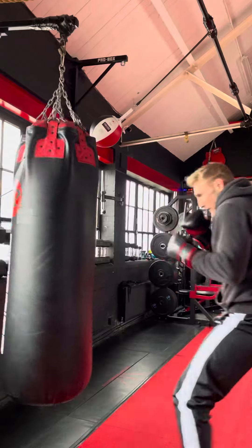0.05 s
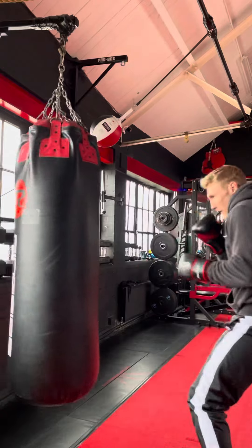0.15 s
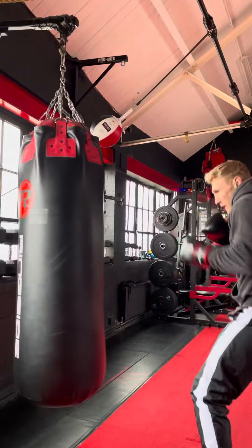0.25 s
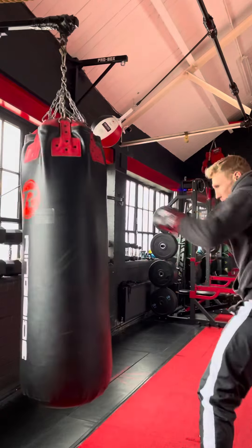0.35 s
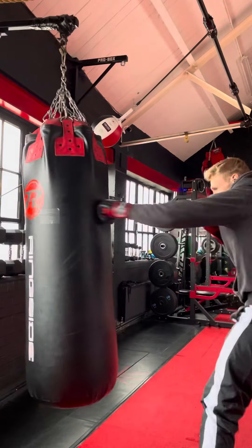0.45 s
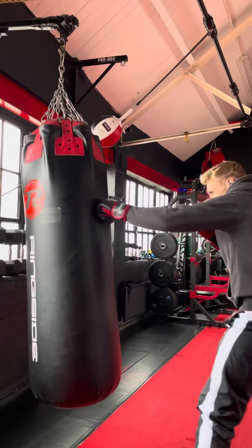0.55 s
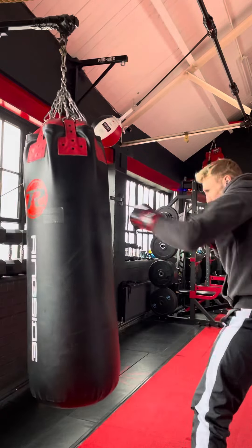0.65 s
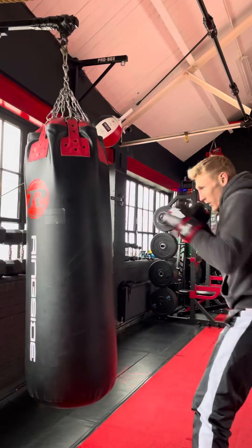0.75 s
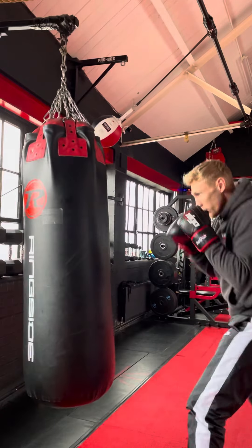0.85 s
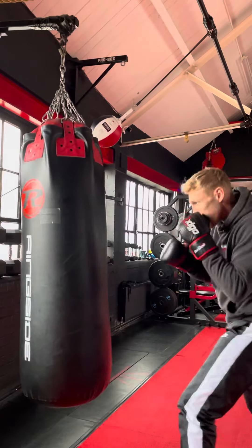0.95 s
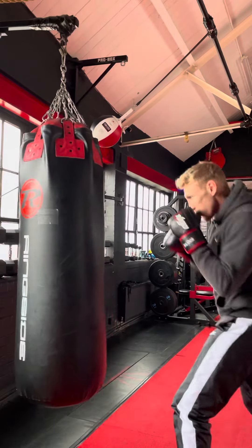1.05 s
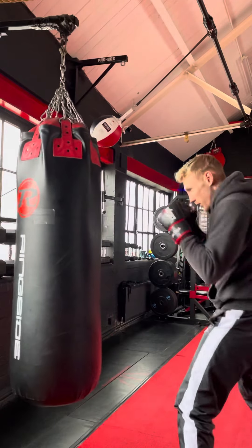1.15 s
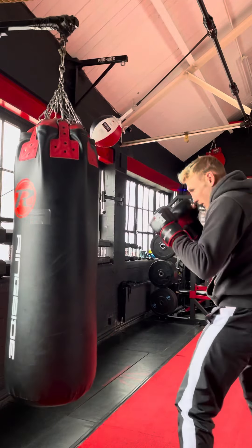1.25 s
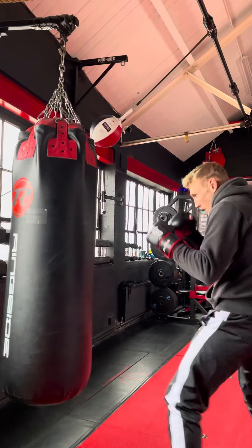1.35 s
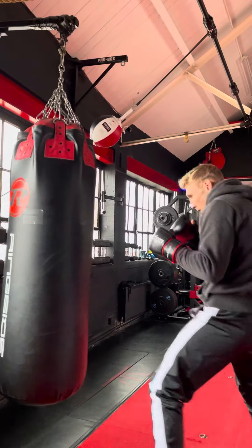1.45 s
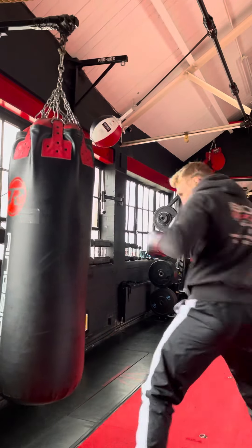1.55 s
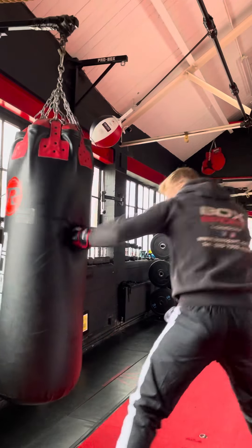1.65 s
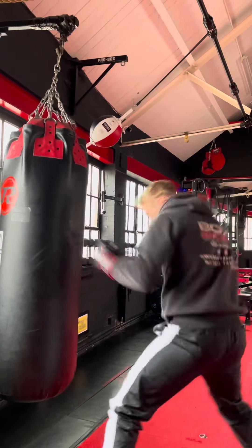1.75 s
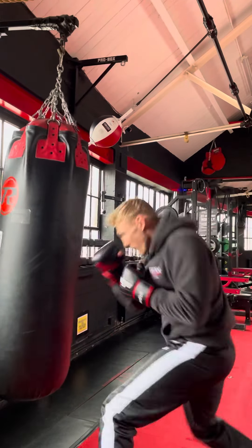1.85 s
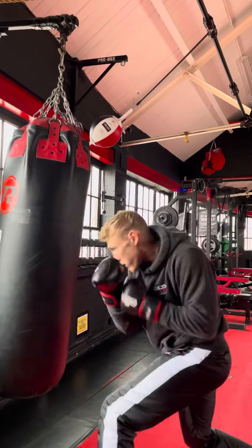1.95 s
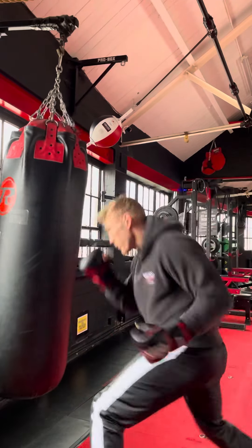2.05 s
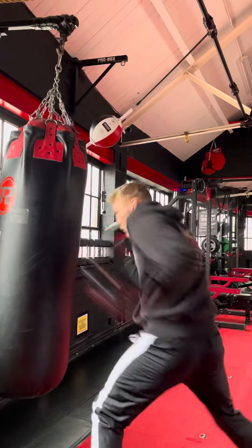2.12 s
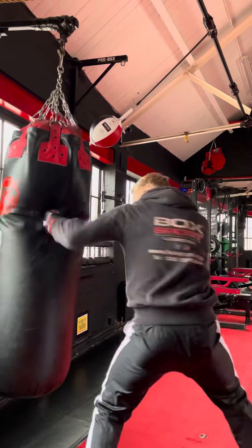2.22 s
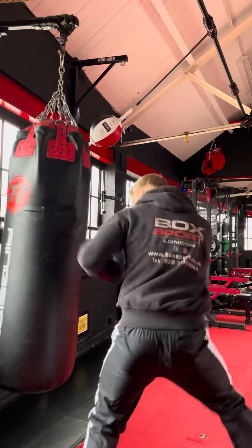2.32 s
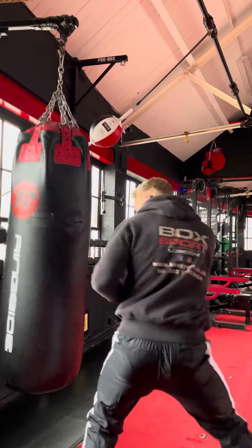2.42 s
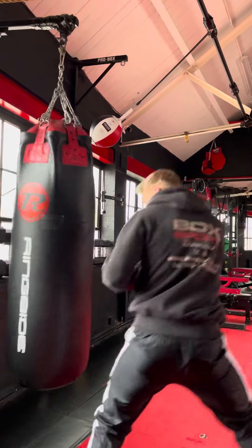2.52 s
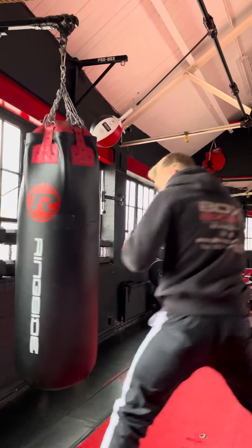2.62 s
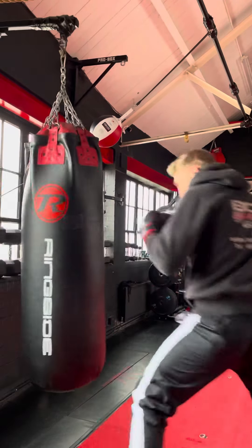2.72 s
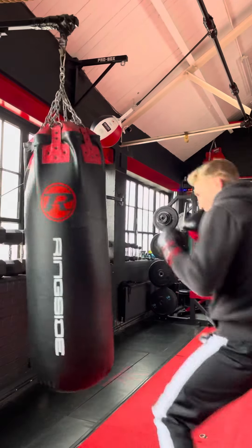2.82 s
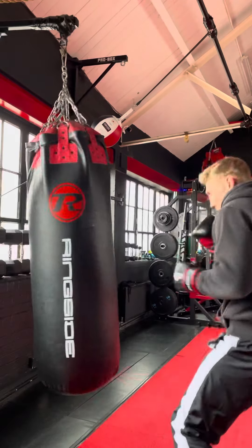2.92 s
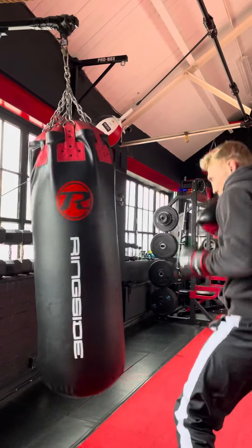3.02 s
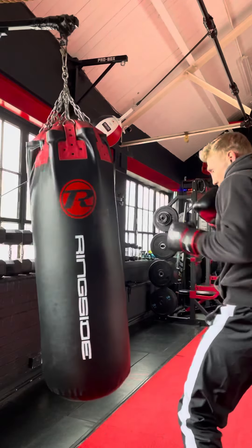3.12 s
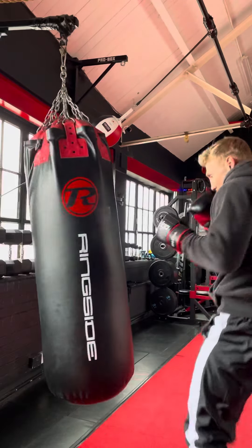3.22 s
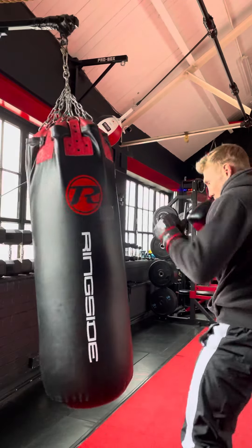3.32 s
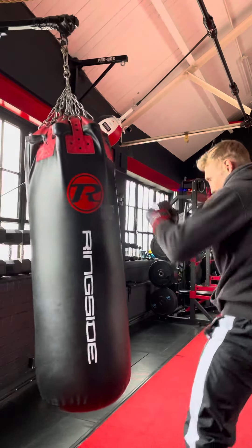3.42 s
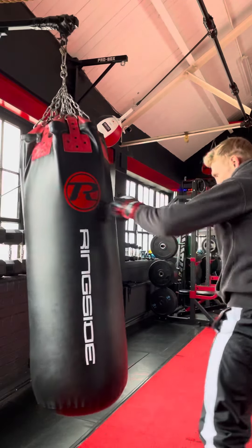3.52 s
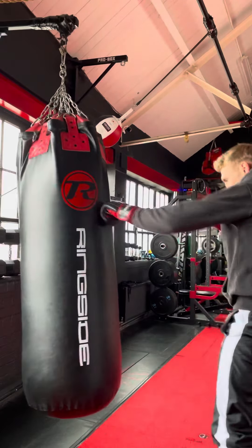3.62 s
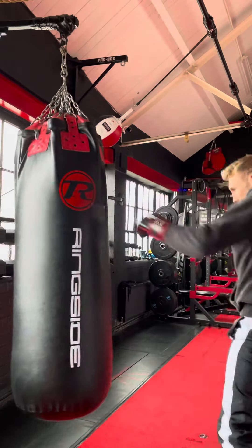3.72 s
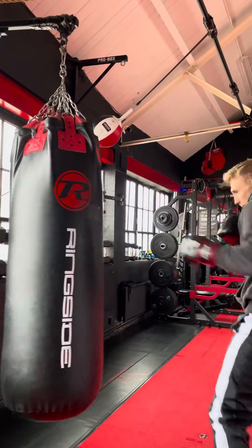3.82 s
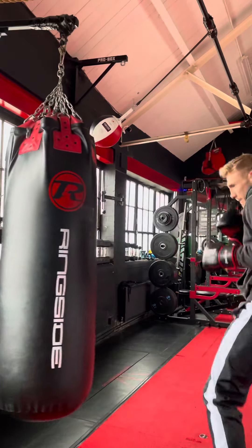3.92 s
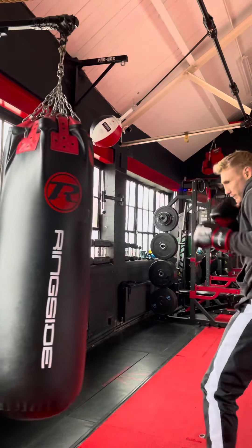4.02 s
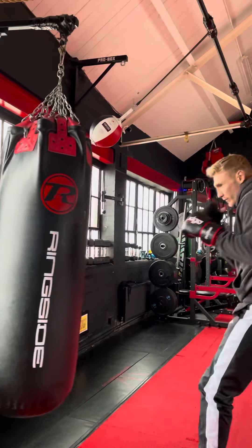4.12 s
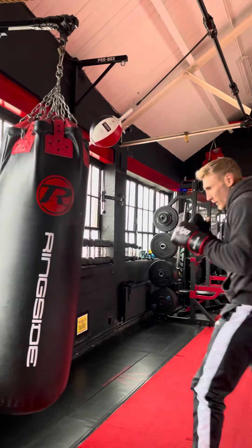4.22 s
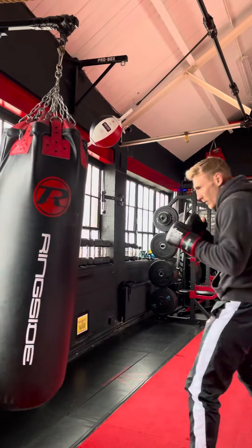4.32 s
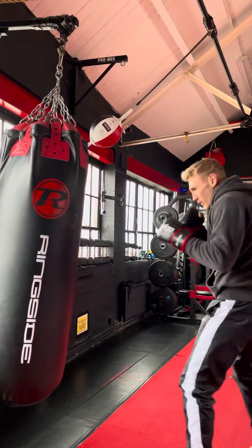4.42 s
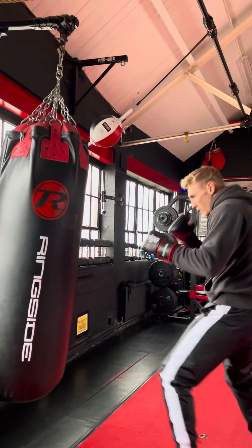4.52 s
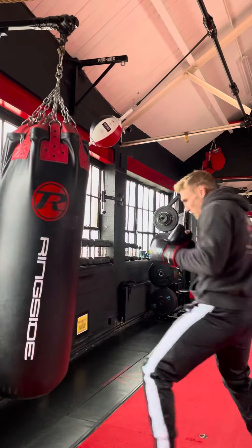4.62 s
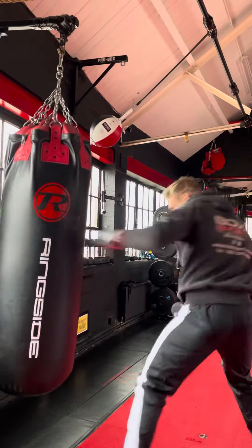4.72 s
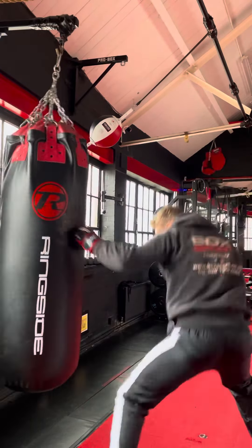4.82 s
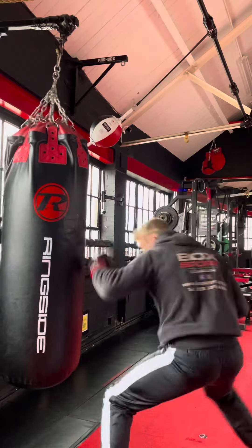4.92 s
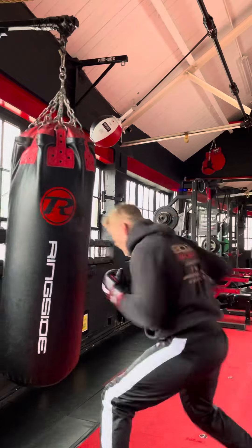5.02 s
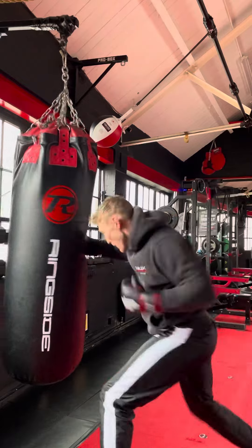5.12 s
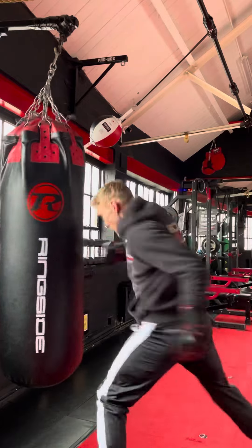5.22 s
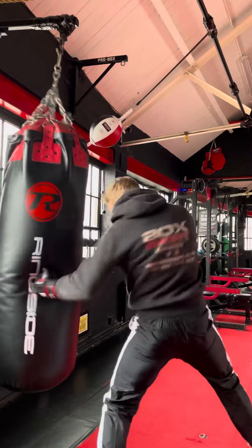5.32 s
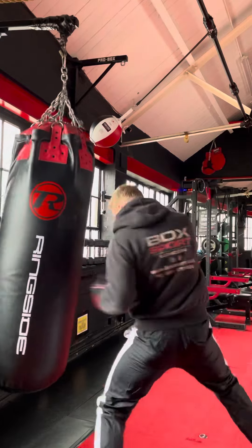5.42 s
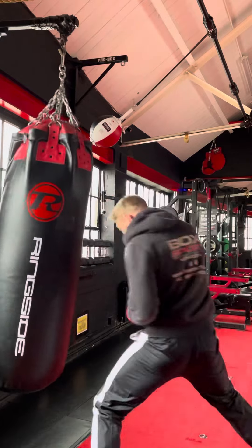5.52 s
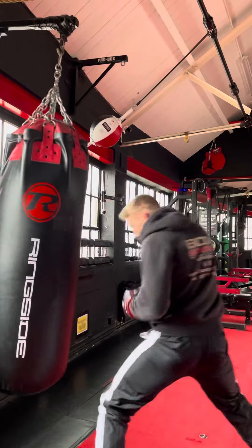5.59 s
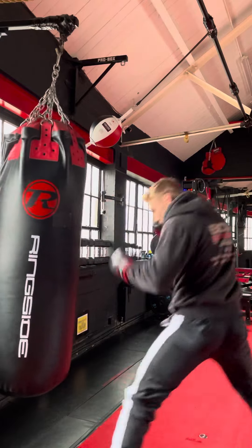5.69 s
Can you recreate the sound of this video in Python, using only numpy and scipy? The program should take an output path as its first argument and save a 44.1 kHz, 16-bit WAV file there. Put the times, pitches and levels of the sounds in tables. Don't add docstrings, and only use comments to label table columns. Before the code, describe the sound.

A boxer's gloved fists crack and thud into a hanging leather heavy bag in a reverberant gym, chain jingling and squeaking after each blow.

```python
import sys
import numpy as np
from scipy import signal
from scipy.fft import rfft, irfft
from scipy.io import wavfile
from scipy.ndimage import uniform_filter1d

SR = 44100
rng = np.random.default_rng(int(sys.argv[2]) if len(sys.argv) > 2 else 0)


def bounce(signal):
    frames = np.transpose(np.atleast_2d(signal))
    limited = np.clip(frames, -1, 1)
    pcm = np.round(limited * 32767).astype(np.int16)
    wavfile.write(sys.argv[1], SR, pcm)


def attenuation_scalar(level_db):
    decades = np.asarray(level_db, float) / 20
    return 10 ** decades


N = 253619
GAIN_HOP = 64
PUNCH_LEAD_S = 0.012

# (frequency [Hz], level [dB per Hz])
CRACK_COLOUR = [(200, 11), (800, -3), (2000, -1.5), (3200, 0), (5000, -4), (7000, -4.5), (11000, -15.5),
                (16000, -20)]


def leather_crack(t, sweep, brush_db, slap_ms, slap_db):
    after = np.maximum(t, 0)
    grit = evened(colour(rng.standard_normal(len(t)), lambda hz: attenuation_scalar(read(CRACK_COLOUR, hz))))
    snap = (t > 0) * grit * attenuation_scalar(-60 * after / 0.0061)
    late = np.maximum(t - slap_ms / 1000, 0)
    second = (late > 0) * grit * attenuation_scalar(slap_db - 60 * late / 0.01)
    rubbed = evened(colour(grit, lambda hz: 1 / (1 + ((hz - 3300) / 2200) ** 4)))
    brush = rubbed * attenuation_scalar(brush_db - 60 * after / 0.015) * np.clip((t + 0.011) / 0.008, 0, 1)
    return 1.376 * sweep * attenuation_scalar(-60 * after / 0.016) + 1.5 * snap + second + brush


def filling_thud(after, sweep, crack_db, thud_db, thud_hz):
    wall_s, wall_db = 0.01096, -13.5
    thud = attenuation_scalar(9.0) * sweep * (1 - np.exp(-after / 0.004)) * attenuation_scalar(-60 * after / 0.056)
    knock = (after > 0) * np.sin(2 * np.pi * 3.39 * thud_hz * after) * attenuation_scalar(-60 * after / 0.033)
    packed = attenuation_scalar(thud_db) * thud + attenuation_scalar(crack_db - 12.5) * knock
    delayed = np.roll(packed, round(wall_s * SR))
    return packed + attenuation_scalar(wall_db) * colour(delayed, lambda hz: 1 / (1 + (hz / 260) ** 4))


# (frequency [Hz], level [dB], T60 [s])
BAG_MODES = [(97.2, -1, 0.53), (120, -27, 0.31), (147.6, 6.5, 0.28), (204, 14.5, 0.11)]


def bag_boom(after, boom_db, swing_db):
    boom = 0
    for hz, db, t60 in BAG_MODES:
        mode_hz = hz * rng.uniform(0.928, 1.07)
        boom = boom + attenuation_scalar(db - 60 * after / t60) * np.sin(2 * np.pi * (mode_hz * after + rng.random()))
    swing = np.sin(2 * np.pi * (42 * after + 0.69 * (1 - np.exp(-after / 0.017))))
    swing = swing * attenuation_scalar(swing_db - 60 * after / 0.62)
    fold = 1.06 * np.sin(2 * np.pi * 185 * after) * attenuation_scalar(swing_db + 7.0 - 60 * after / 0.13)
    swell_in = 1 - np.exp(-after / 0.0041)
    return swell_in * (attenuation_scalar(boom_db) * boom + swing + fold)


# (time [s], crack peak [dB], brush [dB], second slap delay [ms], second slap [dB])
PUNCHES = [
    (0.4613, -20.5, -26, 4.4, -3.5),
    (1.6426, -10, -31, 3.9, -0.5),
    (2.208, -6, -14, 5.4, 6.5),
    (4.7542, -5, -30, 3.24, -4),
    (5.1195, -14, -11.5, 3.3, 6.5),
    (5.3274, -7.5, -13.5, 3.82, 6),
]
# (thud [dB], thud pitch [Hz], boom [dB], swing of the whole bag [dB], hall [dB])
FILLING = [
    (-25, 205, -36.5, -39, -6.5),
    (-17, 294, -28.5, -50, -2),
    (-14.5, 294, -33.5, -23, -7.5),
    (-22, 267, -27, -50, -4),
    (-13, 316, -28, -21.5, -1),
    (-17.5, 282, -28, -19, -5.5),
]


def punch(crack_db, brush_db, slap_ms, slap_db, thud_db, thud_hz, boom_db, swing_db):
    t = np.arange(-PUNCH_LEAD_S, 0.45, 1 / SR)
    after = np.maximum(t, 0)
    packing_hz = thud_hz * (0.552 + 0.83 * np.exp(-after / 0.0076))
    sweep_hz = packing_hz + 5000 * np.exp(-after / 0.000415)
    sweep = np.sin(2 * np.pi * np.cumsum(sweep_hz * (t > 0)) / SR)
    crack = attenuation_scalar(crack_db) * leather_crack(t, sweep, brush_db, slap_ms, slap_db)
    thud = filling_thud(after, sweep, crack_db, thud_db, thud_hz)
    return crack + thud + bag_boom(after, boom_db, swing_db)


# (start [s], peak [dB], pitch [Hz])
THUMPS = [(1.649, -23, 110), (1.689, -22, 107), (1.756, -22, 104.5), (1.864, -23, 104), (1.95, -26.5, 93.3),
          (2.206, -18, 68.4), (4.756, -16, 120), (4.795, -21, 112), (4.867, -23, 110), (4.974, -20.5, 109),
          (5.054, -25.5, 108), (5.119, -19.5, 70), (5.325, -20.5, 87), (5.422, -22, 98)]


def thump(db, hz):
    length_s = 0.044
    t = np.arange(int(length_s * SR)) / SR
    return attenuation_scalar(db) * np.sin(np.pi * t / length_s) ** 2 * np.sin(2 * np.pi * hz * t * (1.15 - 4 * t))


# (time [s], peak [dB], middle pitch [Hz], slip length [ms], ring [dB])
SQUEAKS = [(0.075, -32, 11500, 5.8, -28), (0.8636, -37, 11580, 24, -6), (0.953, -25.5, 11530, 21.6, -15),
           (1.0476, -35, 11520, 20.9, -5), (1.131, -28.5, 11530, 20.3, -29.5),
           (1.197, -36.5, 11520, 20.4, -6), (1.3163, -29, 11520, 20, -12), (1.689, -21.5, 11470, 17, -27),
           (1.924, -28.5, 11570, 19, -9.5), (2.015, -32.5, 11470, 38, -6), (2.112, -23.5, 11450, 25, -10),
           (2.9358, -20, 11480, 16, -23), (3.0242, -31, 11470, 24.6, -13), (3.116, -30, 11500, 18, -17.5),
           (4.8058, -21, 11430, 19, -15), (5.0643, -19.5, 11420, 12.4, -30), (5.1677, -31.5, 11360, 19, -4),
           (5.2617, -33.5, 11450, 24, 2), (5.636, -30, 11460, 20, -8)]
# (time [s], peak [dB], middle pitch [Hz], rise [Hz], ring [dB])
LINKS = [(.074, -40, 10200, 600, -18), (2.402, -35, 10750, 80, -10), (2.5067, -28, 9150, 80, -8),
         (2.527, -31, 9330, 250, -8), (2.7337, -26, 11980, 80, -15), (2.748, -27, 9000, 450, -22),
         (2.762, -30, 9440, 30, -3), (2.8295, -25, 11200, 80, -15), (2.924, -29, 10800, 150, -10),
         (3.388, -41, 9800, 600, -20), (5.378, -29, 10830, 80, -9)]
HOOK_RISE_HZ, LINK_SLIP_MS = 374, 20.7


def squeak(db, hz, rise_hz, slip_ms, ring_db):
    t = np.arange(SR // 2) / SR
    slip_s = slip_ms / 1000
    progress = np.minimum(t / slip_s, 1)
    waver = 45 * evened(uniform_filter1d(rng.standard_normal(len(t)), size=200))
    pitch = hz - 0.5 * rise_hz + rise_hz * progress + waver
    push = np.sin(np.pi * progress ** 0.7)
    ring = (1 - np.exp(-t / slip_s)) * attenuation_scalar(ring_db - 60 * t / 0.62)
    return attenuation_scalar(db - 1) * (push + ring) * np.sin(2 * np.pi * np.cumsum(pitch) / SR)


# (frequency [Hz], width [Hz], level [dB])
JINGLE_MODES = [(13300, 90, 0), (13390, 70, -2), (13520, 80, -2), (13710, 80, -4), (14250, 70, -9)]
# (frequency [Hz], level [dB per Hz])
FIZZ_COLOUR = [(7000, -8), (8500, 10.5), (9500, 4.5), (11000, 7.5), (12100, -2), (12500, -26), (14500, -27),
               (15800, -38)]
# (time [s], jingle [dB], fizz [dB], held [s], fade by 20 dB [s])
SHAKES = [(0.0, -56.5, -55.5, 0.012, 0.3), (.215, -58.5, -60, 0.03, 0.4), (.525, -50.5, -56, 0.2, 0.34),
          (.82, -47, -62, 0.044, -1.1), (.93, -52, -51.5, 0.035, 0.17), (1.04, -65, -62, 0.053, -0.8),
          (1.16, -62, -73, 0.097, .02), (1.5, -90.5, -82, .1, -2), (1.76, -38, -41.5, 0.12, -1.3),
          (1.89, -32.5, -40, .02, 0.3), (1.99, -32.5, -40, 0.017, 0.43), (2.26, -36, -37, 0.045, 0.66),
          (2.55, -52, -35.5, 0.071, 0), (2.93, -55, -49, 0.13, 0.12), (3.2, -69, -66, .12, 0.5),
          (3.45, -72, -56, 0.15, 0.2), (3.83, -69, -61.5, 0.083, 0.1), (3.99, -75, -64.5, 0.051, 0.4),
          (4.21, -75, -77, 0.13, -0.5), (4.56, -72.5, -66, 0.047, 4), (4.83, -33.5, -38.5, 0.048, 0.5),
          (5.08, -39, -35.5, 0.024, 1.2), (5.24, -35, -40, 0.19, .5), (5.66, -41.5, -43, 0.053, 3)]


def chain():
    rise_s = 0.053
    struck = rng.random(N) < 2200 / SR
    force = attenuation_scalar(2.3 * np.minimum(rng.exponential(1, N), 4)) * rng.standard_normal(N)

    def modes(f):
        return sum(attenuation_scalar(db) / (1 + 1j * (f - hz) / width) ** 3 for hz, width, db in JINGLE_MODES)

    ring = evened(colour(struck * force, modes))
    jingle_gain = summed(swell(s, db, held, fade, rise_s) for s, db, _, held, fade in SHAKES)
    fizz_gain = summed(swell(s, db, held, 0.86 * fade, 2.3 * rise_s) for s, _, db, held, fade in SHAKES)
    jingle = attenuation_scalar(8.5) * ring * jingle_gain
    fizz = attenuation_scalar(-5) * noise(FIZZ_COLOUR, patchy_db=5.5) * fizz_gain
    return jingle + attenuation_scalar(-30) * hall(jingle) + fizz


# (start [s], level [dB], reach downwards [octaves])
FLECKS = [(.04, -78, .15), (.15, -71, 0.092), (.295, -76, .15), (.455, -68, 0.077), (.55, -75, .15),
          (.665, -68, 0.11), (.69, -58, .03), (.8, -70, .14), (.915, -58, .04), (1.1, -80, .15),
          (1.165, -68, .1), (1.53, -71, 0.089), (1.58, -72.5, .03), (1.71, -66, .15), (2.21, -54, 0.083),
          (2.73, -47, 0.13), (2.89, -58, .03), (3.11, -75, .12), (3.405, -75, .04), (3.435, -69, .04),
          (3.525, -67, .04), (3.575, -68, .03), (3.725, -71, .03), (3.8, -76, .1), (3.825, -72, .03),
          (3.96, -76, .08), (4.14, -83, 0.071), (4.18, -73, 0.023), (4.47, -75, .04), (4.52, -82, .04),
          (4.66, -75, .04), (4.69, -73, .04), (5.7, -51, 0.11), (.93, -63, .1), (1.875, -44, .03),
          (1.975, -41, .1), (2.087, -48.5, 0.027), (2.49, -52, 0.092), (2.567, -46, 0.026),
          (2.92, -52, 0.089), (3.04, -58, 0.17), (4.79, -45, 0.027), (4.91, -34, 0.17), (5.05, -40, 0.027),
          (5.11, -43, 0.079), (5.275, -44, 0.092), (5.582, -51, .03)]


def fleck(db, octaves):
    return attenuation_scalar(2) * scrape(db, 15950 / 2 ** octaves, octaves, 0.045)


# (time [s], level [dB], centre [Hz], width [octaves], length [s])
SCRAPES = [(1.53, -57, 600, .6, .06), (2.64, -47, 5400, .07, .22), (2.77, -42, 200, .4, .1),
           (3.03, -43, 3000, .8, .06), (3.52, -45, 340, .15, .15), (4.24, -51, 300, .5, .07),
           (4.32, -51, 430, .25, .4), (.82, -54, 3400, .08, .07), (1.97, -47, 3200, .12, .07),
           (4.81, -44, 2090, .04, .13), (5.43, -39, 200, .2, .32), (3.385, -50, 2000, .15, .025)]


def scrape(db, hz, octaves, length):
    u = np.linspace(0, 1, int(length * SR))
    band = colour(rng.standard_normal(len(u)), lambda f: np.exp(-(np.log2((f + 1) / hz) / octaves) ** 2))
    return attenuation_scalar(db) * evened(band) * np.sin(np.pi * u ** 0.65)


# (time [s], peak [dB], centre [Hz], hall [dB])
TICKS = [(0.075, -34.5, 860, 6), (0.158, -34.5, 2500, -13), (0.209, -32, 3120, -8), (0.310, -35, 2000, -15),
         (0.382, -41.5, 2050, -20), (0.419, -42, 1270, -15), (0.642, -32, 810, -23), (0.739, -37, 1200, 4),
         (0.807, -28.5, 1910, -8), (0.929, -33, 3400, 2), (0.964, -33.5, 3800, -6), (1.06, -38.5, 1170, 5),
         (1.539, -43, 795, 4), (1.596, -45, 900, 4), (2.086, -28.5, 4470, 4.5), (2.656, -24, 5240, 4.5),
         (2.927, -28.5, 1080, -4), (3.023, -22, 2410, -27), (3.033, -31, 3000, -17),
         (3.048, -29, 2780, -13), (3.252, -45, 1200, -6), (3.391, -33, 500, -15.5), (3.419, -41, 800, -15),
         (3.967, -42.5, 700, -5), (3.562, -34, 2640, 7.5), (3.847, -35.5, 4200, 3), (4.189, -42, 4300, 5.5),
         (4.254, -37.5, 910, 1), (4.344, -40, 1390, -2), (4.428, -42, 1120, 9)]


def tick(db, hz):
    t = np.arange(4000) / SR

    def broad_band(f):
        return 1 / (1 + (1.44 * np.log((f + 1) / hz)) ** 2) / (1 + (f / 13000) ** 4)

    band = evened(colour(rng.standard_normal(len(t)), broad_band))
    body = attenuation_scalar(db - 10 - 26 * t / 0.0154)
    edge = attenuation_scalar(db - 3.5 - 60 * t / 0.0043)
    return band * (body + edge)


def settling():
    late_s, rise_s, fade_s = 0.049, 0.043, 0.5
    return sum(swell(blow[0] + late_s, blow[1] + filling[-1], 0, fade_s, rise_s)
               for blow, filling in zip(PUNCHES, FILLING))


# (frequency [Hz], level [dB per Hz])
FEET_COLOUR = [(100, -28), (140, -5), (180, -2), (260, -4), (335, -4.5), (420, -5), (520, -5.5),
               (1000, -21), (1400, -70)]
# (frequency [Hz], level [dB per Hz])
RUSTLE_COLOUR = [(410, -12), (700, -2.5), (1130, -5.5), (1740, -8), (3160, -12.5), (4400, -10.5),
                 (5390, -15), (9000, -23), (12500, -54)]
# (time [s], level [dB])
MOTION = [(0, -47.5), (.15, -55), (.42, -57.5), (.66, -51.5), (1.0, -53), (1.3, -62.5), (1.55, -64.5),
          (2.0, -49), (2.7, -43), (2.9, -45.5), (3.08, -47.5), (3.27, -55.5), (3.57, -50), (3.72, -63),
          (3.85, -55), (4.1, -66), (4.4, -64), (5.75, -42.5)]
# (time [s], level [dB], fade by 20 dB [s])
SHUFFLES = [
    (.1, -51.5, 1.6),
    (2.85, -42.5, .5),
    (3.25, -47.5, 1.8),
    (3.58, -45.5, 0.4),
    (4.3, -50, 1.5),
    (4.52, -43.5, 0),
    (5.24, -46, -2.5),
]


def boxer(settle):
    motion_db = np.interp(np.arange(0, N + GAIN_HOP, GAIN_HOP) / SR, *np.transpose(MOTION))
    steps = [swell(s, db, 0, fade, 0.067) for s, db, fade in SHUFFLES]
    walking = attenuation_scalar(-6.5 + 0.84 * motion_db)
    feet = attenuation_scalar(1.5) * noise(FEET_COLOUR, patchy_db=2.5, size=1024)
    feet = feet * summed(steps + [walking, attenuation_scalar(-20) * settle])
    rustle = attenuation_scalar(2) * noise(RUSTLE_COLOUR, patchy_db=3.0)
    return feet + rustle * summed([attenuation_scalar(motion_db), attenuation_scalar(-22) * settle])


# (frequency [Hz], level [dB per Hz])
THROB_COLOUR = [(20, -55), (40, -9.5), (60, -1), (80, 0), (97, 0), (115, -6.5), (140, -5.5), (180, -20),
                (230, -48.5)]
# (peak time [s], level [dB], fade by 20 dB [s])
THROBS = [(0.099, -34, 0), (.51, -38, 0.2), (.8, -41.5, 0.2), (1.02, -43.5, 0.5), (1.499, -43, 0.7),
          (2.75, -39.5, .5), (3.27, -45.5, 0.3), (3.79, -40, 0.27), (4.0, -51, -3), (4.21, -43, 0.83),
          (4.449, -39.5, 0), (5.7, -35.5, 2)]


def bracket_and_floor(settle):
    leaning = [swell(s, db, 0, fade, min(fade, 0.3)) for s, db, fade in THROBS]
    load = summed([attenuation_scalar(-53), attenuation_scalar(-18) * settle] + leaning)
    throb = attenuation_scalar(-2.0) * noise(THROB_COLOUR, patchy_db=1.5, size=2048)
    wander = evened(uniform_filter1d(uniform_filter1d(rng.standard_normal(N), size=2500), size=2500))
    hum = attenuation_scalar(-3) * np.sin(2 * np.pi * np.cumsum(98 + 12 * wander) / SR)
    return (throb + hum) * load


# (frequency [Hz], T60 [s])
HALL_T60 = [(60, 0.39), (250, 0.58), (1000, 0.75), (4000, 0.95), (9000, 0.36), (14000, 0.38)]


def hall(x):
    taps = np.zeros((2, SR))
    at = np.arange(500, SR - 20, 20) + rng.integers(0, 20, (2, (SR - 501) // 20))
    np.put_along_axis(taps, at, rng.choice([-1., 1.], at.shape), 1)
    hz, t, z = signal.stft(taps, SR, nperseg=256)
    fading = z * attenuation_scalar(-60 * t / read(HALL_T60, hz)[:, None])
    tail = signal.istft(fading, SR, nperseg=256)[1]
    return signal.fftconvolve(x[None], tail / np.linalg.norm(tail[0]), axes=1)[:, :N]


def evened(x):
    return x / np.sqrt(np.mean(x ** 2) + 1e-20)


def read(points, hz):
    f, value = np.transpose(points)
    return np.interp(np.log(hz + 1), np.log(f + 1), value)


def add(mix, s, sound):
    part = mix[max(round(s * SR), 0):][:len(sound)]
    part += sound[:len(part)]


def colour(x, gain):
    return irfft(rfft(x) * gain(np.fft.rfftfreq(x.shape[-1], 1 / SR)), x.shape[-1])


def noise(spectrum, patchy_db, size=512):
    frames, hz = 4 * N // size + 5, np.fft.rfftfreq(size, 1 / SR)
    a, b, c, d, patches = rng.standard_normal((frames, len(hz), 5)).T
    patches = uniform_filter1d(patches, size=8, axis=0)
    patches = evened(uniform_filter1d(patches, size=5, axis=1))
    gain = attenuation_scalar(read(spectrum, hz)[:, None] + patchy_db * patches)
    z = np.array([a + 1j * b, c + 1j * d]) * gain
    return evened(signal.istft(z, nperseg=size, noverlap=3 * size // 4)[1][:, :N])


def swell(s, db, held, fade, rise):
    t = np.arange(0, N + GAIN_HOP, GAIN_HOP) / SR - s
    climb = np.maximum(-t, 0) / max(rise, 0.005)
    fall = np.maximum(t - held, 0) / max(fade, 0.01)
    return attenuation_scalar(db - 20 * (climb + fall))


def summed(gains):
    power = sum(g ** 2 for g in gains)
    return np.interp(np.arange(N), GAIN_HOP * np.arange(len(power)), np.sqrt(power))


# (frequency [Hz], level [dB])
WALLS = [(100, -5), (500, 1.5), (1200, 1), (3000, -2.5), (6000, -1.5), (10000, 0.5), (14000, -2.5)]


def scene():
    near, far = np.zeros(N), np.zeros(N)

    def place(s, sound, hall_db):
        add(near, s, sound)
        add(far, s, attenuation_scalar(hall_db) * sound)

    for (s, *blow), (*filling, hall_db) in zip(PUNCHES, FILLING):
        place(s - PUNCH_LEAD_S, punch(*blow, *filling), hall_db)
    for s, *jerk in THUMPS:
        add(near, s, thump(*jerk))
    for s, db, hz, slip_ms, ring_db in SQUEAKS:
        place(s, squeak(db, hz, HOOK_RISE_HZ, slip_ms, ring_db), -5)
    for s, db, hz, rise_hz, ring_db in LINKS:
        place(s, squeak(db, hz, rise_hz, LINK_SLIP_MS, ring_db), -5)
    for s, *flicker in FLECKS:
        add(near, s, fleck(*flicker))
    for s, *drag in SCRAPES:
        place(s, scrape(*drag), -6)
    for s, db, hz, hall_db in TICKS:
        place(s, tick(db, hz), hall_db - 0.5)
    bounced = 0.7 * np.roll(near, 75)
    echoes = hall(colour(far, lambda hz: attenuation_scalar(read(WALLS, hz))))
    settle = settling()
    return np.array([near, bounced]) + echoes + chain() + boxer(settle) + bracket_and_floor(settle)


def band_limit(x):
    return signal.sosfilt(signal.butter(12, 16690, fs=SR, output="sos"), x)


# (frequency [Hz], likeness [0..1])
SAME = [(100, .998), (160, .992), (320, .965), (650, .5), (3000, .47), (6500, .35), (6950, .96),
        (12000, .96), (14000, .99)]
# (frequency [Hz], phase [rad])
LEAD = [(0, 0), (2000, -.2), (3900, -.7), (4800, -.9), (5900, .7), (6900, 2.9), (8500, 3.4), (9500, 5.8),
        (12200, 6.5), (12700, 9.3), (13300, 8.55), (13800, 8.8), (14100, 9.1), (14600, 9.7), (15000, 10.4),
        (17000, 10.4)]
# (frequency [Hz], level [dB])
TILT = [(100, 0), (200, .6), (380, 1.6), (700, 4.9), (1400, 2.8), (2800, 1), (5600, .8), (9000, 0)]


def record(dry):
    hz = np.fft.rfftfreq(N, 1 / SR)
    same = np.clip(read(SAME, hz), 0, 1)
    shared, extra = rfft(dry)
    port = attenuation_scalar(read(TILT, hz) / 2) * np.exp(0.5j * np.interp(hz, *np.transpose(LEAD)))
    right = same * shared + np.sqrt(1 - same ** 2) * extra
    pair = irfft(np.array([shared * port, right / port]), N)
    limited = 1.1 * np.tanh(pair / 1.1)
    dulled = colour(limited, lambda f: 1 / (1 + (f / 15950) ** 80))
    return band_limit(dulled)


dry = scene()
out = record(dry)
bounce(out)
```